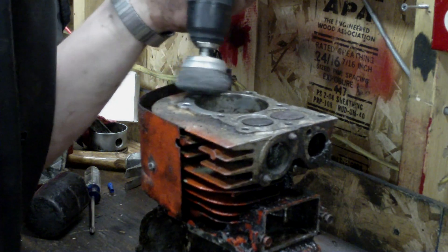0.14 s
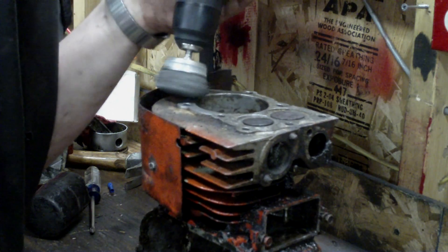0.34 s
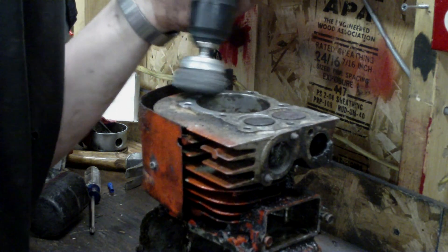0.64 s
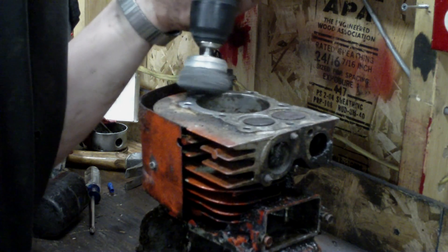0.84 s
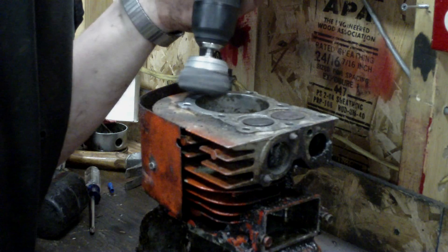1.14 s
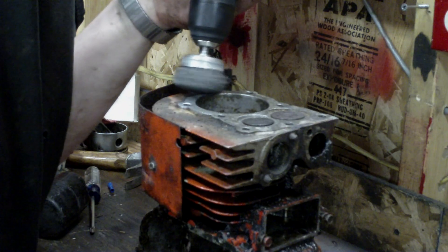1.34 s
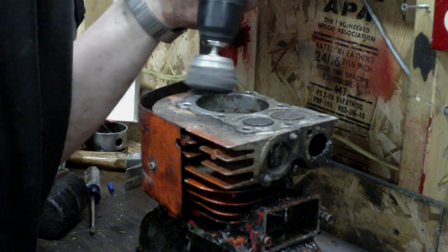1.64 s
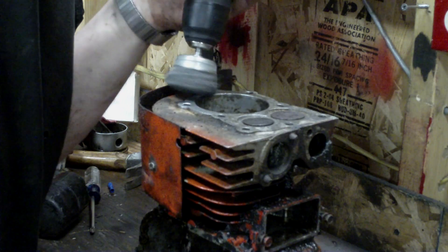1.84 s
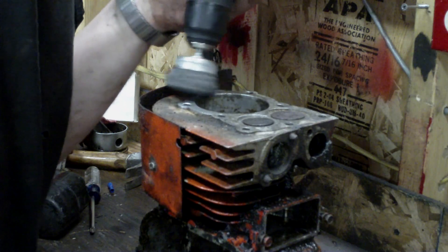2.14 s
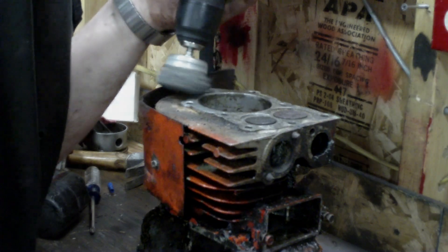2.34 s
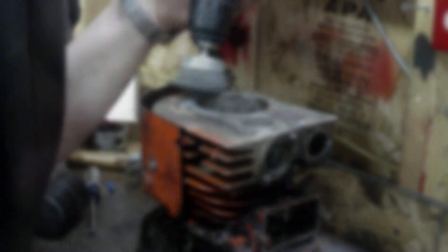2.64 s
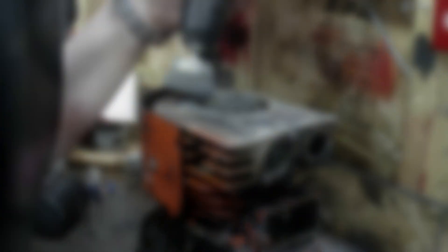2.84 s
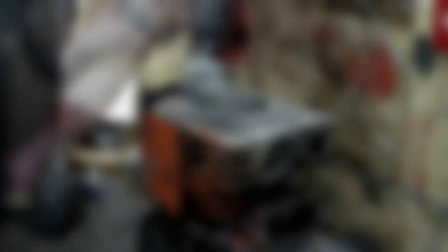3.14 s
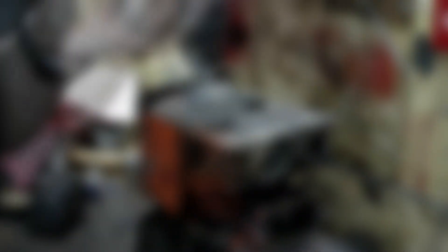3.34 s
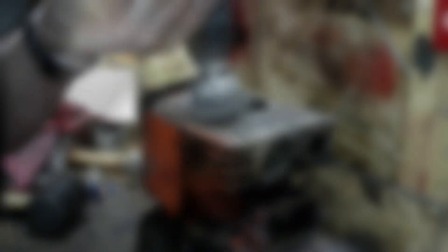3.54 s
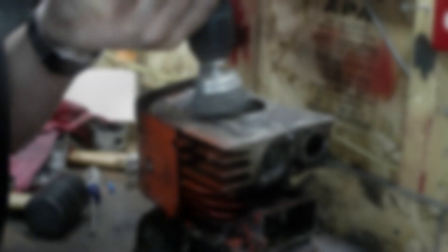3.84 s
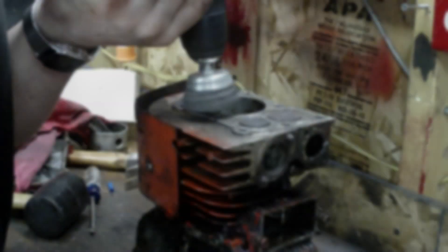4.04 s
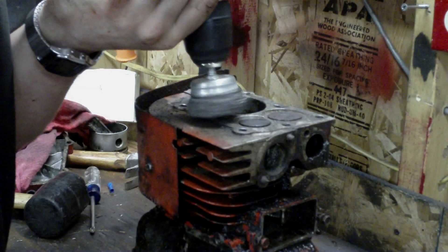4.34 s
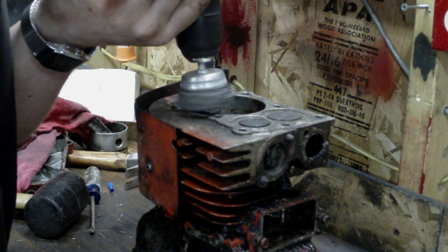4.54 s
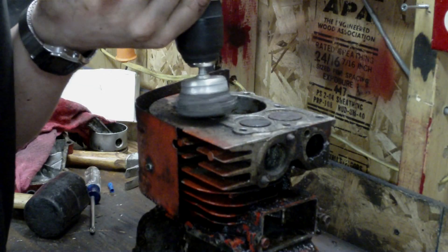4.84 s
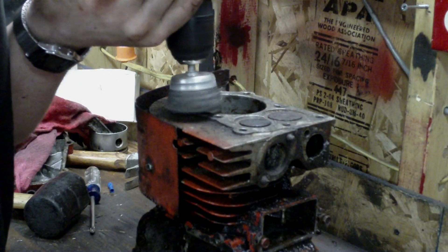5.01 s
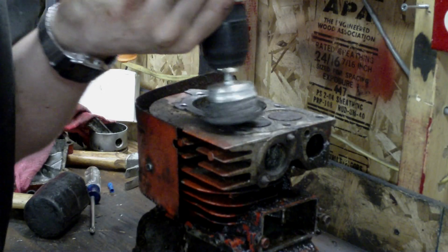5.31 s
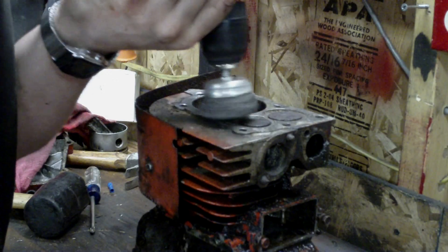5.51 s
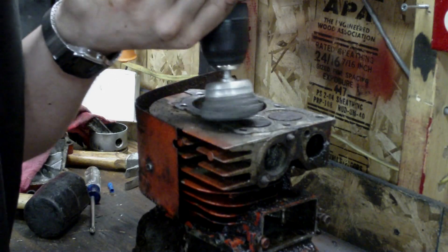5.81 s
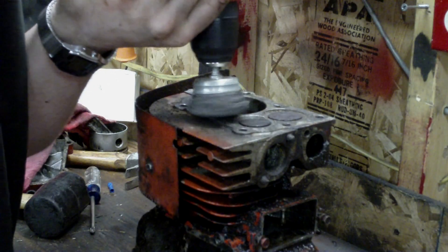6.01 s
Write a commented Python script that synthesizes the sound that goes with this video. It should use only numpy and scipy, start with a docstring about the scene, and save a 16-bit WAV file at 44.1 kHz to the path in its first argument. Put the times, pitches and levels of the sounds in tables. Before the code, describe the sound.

From the start, a wire cup brush on an electric drill scrapes loudly against a metal engine block. The sound is a dense, harsh, hissing rasp with a bright metallic ring that wavers as the brush tilts and bites. The drill's motor whines steadily underneath. At about 2.7 seconds a harder bite makes the metal sing briefly. From 3 seconds the scraping fades, reaching its quietest near 3.7 seconds, while a faster, softer pass swells in without a gap, carrying a higher, slightly wobbling whine. The brush catches in short surges around 4 and 4.6 seconds, then grows a little and continues until about 6 seconds, still quieter than the opening. A faint bench rumble runs beneath, with two barely audible dull ticks near 2.6 and 4.6 seconds. The sound is mono and thin in the bass, with a short workshop echo.

```python
"""A loud, harsh scraping over a motor's whine: a drill spins a wire cup brush on a finned engine block.
Thousands of wire tips scratch the metal and make it ring, and the workshop walls add a short echo.
This slow, loud pass fades away while a faster, quieter pass swells in.
Underneath, the bench rumbles and there are two faint ticks. The sound is mono and thin in the bass."""
import sys
import numpy as np
from scipy import signal
from scipy.fft import rfft, irfft, next_fast_len
from scipy.io import wavfile

SR = 44100
rng = np.random.default_rng(int(sys.argv[2]) if len(sys.argv) > 2 else 0)


def put_to_file(sound):
    """Save the sound as 16-bit audio at rate SR, in the file named by the first command-line argument."""
    columns = np.atleast_2d(sound).T  # one column per channel
    safe = np.clip(columns, -1, 1)
    whole_steps = np.round(safe * 32767)
    wavfile.write(sys.argv[1], SR, whole_steps.astype(np.int16))


N = 272097

# Loudness of each pass; the first fades as the second swells: t/s, base level/dB, extra fin ring/dB
SLOW_LEVEL = [(0, -28, 2), (.19, -26.5, 0.5), (.44, -26, -2), (.62, -28.5, 2.5), (.88, -26, 0),
              (1.02, -26.5, 2), (1.18, -27.5, 1), (1.3, -27.5, 0.5), (1.46, -28, -2), (1.62, -27.5, 2),
              (1.76, -27.5, -2), (1.92, -27.5, 6), (2.02, -27.5, -0.5), (2.3, -27.5, 2), (2.5, -27, 1),
              (2.76, -27.5, 1), (2.97, -30, -1.5), (3.3, -34.5, 1), (3.7, -39.5, 0)]
FAST_LEVEL = [(3.3, -45, -5), (3.85, -41.5, -2.5), (4.25, -38.5, -0.5), (4.46, -37.5, -1),
              (4.62, -36.5, 1.5), (5.1, -34.5, -0.5), (5.5, -33.5, -0.5), (5.75, -34.5, -0.5),
              (5.95, -34.5, -1.5), (6.17, -35, 1)]
# The deep part of the sound: t/s, base level of the low scrape/dB, base level of the rumble/dB
LOW_END = [(0, -54, -79), (.6, -56.5, -72.5), (1.4, -59, -77.5), (2.1, -59.5, -78), (2.65, -54, -75),
           (3.05, -63.5, -76.5), (3.5, -64, -91), (4.07, -65, -75), (4.2, -65.5, -77), (4.42, -67, -89),
           (4.55, -61, -89), (4.8, -60, -90), (5.5, -57.5, -79), (5.95, -60.5, -83), (6.17, -61, -73)]


def brush(slow_db, fast_db, bite_db):
    """Two passes overlap; scrape and fin ring wander as the cup tilts and jump when it bites."""
    # Tone colour of the brush in each pass: f/Hz, relative level/dB
    slow_colour = [(88, -73), (150, -33), (215, -27), (310, -17.5), (449, -17), (666, -9), (841, -13),
                   (1060, -9), (1690, -8), (2100, -8), (2470, -1), (2850, -1.5), (3800, -15), (6060, -18.5),
                   (11000, -28.5)]
    fast_colour = [(88, -64), (150, -25.5), (240, -26.5), (330, -13.5), (441, -12.5), (678, -2), (904, -5),
                   (1420, -2), (1610, -1), (2140, -2.5), (3290, -4), (4470, -12.5), (5850, -15),
                   (11000, -25.5)]
    # The upper fins ring more or less as the cup travels: t/s, boost/dB
    slow_fins = [(0, -13), (.2, 6), (.36, 1), (.48, 0), (1.0, -4), (1.4, 2.5), (1.75, 2), (1.9, 0.5),
                 (2.1, 3.5), (2.28, 2.5), (2.55, 1.5), (2.72, 2), (2.95, 1.5), (3.5, 1)]
    fast_fins = [(3.9, -1.5), (4.35, 0), (4.651, -2), (4.9, 1), (5.15, -3), (5.45, 1), (5.75, -5),
                 (5.95, 0), (6.17, -3)]
    # Added to each pass's base level: scrape/dB, fin ring/dB
    slow_balance = [-6, -3]
    fast_balance = [-4, -4.5]
    # The high hiss: t/s, level/dB
    hiss_levels = [(0.0, -43), (0.27, -40.5), (0.48, -43), (0.51, -39.5), (0.58, -44), (0.62, -41.5),
                   (1.18, -42.5), (1.2, -41), (1.48, -43.5), (1.53, -41.5), (2.06, -42.5), (2.78, -41),
                   (2.82, -43), (3.01, -46), (3.04, -42.5), (3.14, -47.5), (3.2, -45.5), (3.27, -49),
                   (3.35, -48.5), (3.59, -52.5), (3.92, -54), (3.97, -50.5), (4.09, -55.5), (4.14, -47.5),
                   (4.19, -53.5), (4.48, -50.5), (4.52, -48.5), (6.08, -48), (6.15, -50.5), (6.17, -47)]
    slow_bass, *slow, slow_hiss = scrape(slow_colour, slow_fins, fin_hz=2915, fin_width_hz=260, fast=False)
    fast_bass, *fast, fast_hiss = scrape(fast_colour, fast_fins, fin_hz=3840, fin_width_hz=280, fast=True)
    only_ring = np.c_[[0, 1]]  # the two rows are scrape and fin ring
    slow = slow * from_db(slow_db + np.c_[slow_balance] + only_ring * in_time(SLOW_LEVEL)[1])
    fast = fast * from_db(fast_db + np.c_[fast_balance] + only_ring * in_time(FAST_LEVEL)[1])
    tilt_db = np.array([depth_db * drift(3.6) for depth_db in (.35, .25)])
    fast_share = 1 / (1 + from_db(slow_db - fast_db) ** 2)
    slow_mix, fast_mix = np.sqrt(1 - fast_share), np.sqrt(fast_share)
    bass = from_db(in_time(LOW_END)[0] + bite_db[0]) * (slow_mix * slow_bass + fast_mix * fast_bass)
    hiss = from_db(in_time(hiss_levels)[0]) * (slow_mix * slow_hiss + fast_mix * fast_hiss)
    return bass + hiss + np.sum((slow + fast) * from_db(tilt_db + bite_db), axis=0)


def scrape(colour, fin_boost, fin_hz, fin_width_hz, fast, flicker_db=.6):
    """Wire clicks ring the block. Returns four flickering bands: bass, scrape, fin ring and hiss."""
    # Notes the block and fins ring at: f/Hz, width/Hz, slow pass boost/dB, fast pass boost/dB
    block_notes = [(200, 25, 4, 5), (232, 30, -4, -3), (382, 14, 7.5, 0), (678, 30, 6, 2.5),
                   (770, 20, 2, 7), (1076, 40, 3, -1.5), (1140, 16, 5, 7), (1574, 50, 3, 2),
                   (1685, 70, 4, 2.5), (1890, 90, 3.5, 0.7), (2130, 81, -4.5, -3), (2550, 110, 2, -2),
                   (2680, 45, 2, 3), (2810, 70, 3, 1), (2840, 14, 5, 6), (2985, 90, -4.5, -1),
                   (3050, 40, 0, -4), (3100, 100, 3.5, 3), (3300, 50, 0, 2), (3375, 55, 3, 6.5),
                   (3650, 110, 0, 5), (3790, 120, 1, -3), (4060, 100, 3, 1.5), (4980, 210, 3, 2),
                   (5710, 170, 2.5, 3), (6150, 120, 4.5, 2.5), (6620, 90, 4, 3), (7370, 70, 4, 1),
                   (8150, 110, 5, 2.5)]
    # Borders between bass, scrape, fin ring, treble and air: f/Hz
    borders = [500, 2100, 3800, 6800]
    x = bristles()
    for note_hz, width_hz, slow_db, fast_db in block_notes:
        wander = 1 + .35 * drift(4)  # each note comes and goes as the cup moves
        x = ring(x, note_hz, width_hz, (fast_db if fast else slow_db) * wander)
    x = ring(x, fin_hz, fin_width_hz, *in_time(fin_boost))
    size = next_fast_len(N)
    hz = np.maximum(np.arange(size // 2 + 1) * SR / size, 10)
    colour_hz, colour_db = np.transpose(colour)
    spectrum = rfft(x, size) * from_db(np.interp(np.log(hz), np.log(colour_hz), colour_db))
    above = [1] + [1 / (1 + (edge / hz) ** 10) for edge in borders] + [0]  # share above each border
    bands = []
    for low, high, depth in zip(above, above[1:], [2, 1, 1.5, 1.5, 1.5]):
        band = irfft(spectrum * (low - high), size)[:N]
        bands.append(band * from_db(depth * flicker_db * drift(21)))
    *lower, treble, air = bands
    return np.array([unit_level(band) for band in lower + [treble + air]])


def bristles(tips_per_s=14000, spread_db=2.5, clump_db=.5):
    """Wire tips strike at random, in uneven sizes and small clumps."""
    sizes = from_db(spread_db * np.minimum(rng.exponential(1, N), 4)) * rng.choice([-1, 1], N)
    strikes = rng.random(N) < tips_per_s / SR
    return sizes * strikes * from_db(clump_db * drift(11.6))


def pass_levels():
    """The base level of the fading pass and of the swelling pass, and the boost of the bites, in dB."""
    # The cup bounces and its bite changes for a moment: t/s, scrape boost/dB, fin ring boost/dB
    bites = [(.2, 1, -1), (.33, 2.5, -1), (.68, 1.5, 2.5), (.77, 3, 1), (.96, 1, 1.5), (1.01, 1, 0.5),
             (1.24, 1, 2.5), (1.36, 1.5, 2.5), (1.62, 2.5, -0.5), (1.88, 1, -0.5), (2.0, -2, -1),
             (2.12, 1.5, 0.5), (2.26, 1, -1), (2.37, 1, -1), (2.66, 1.5, -1), (2.74, 0, -1), (3.04, 2.5, 3),
             (3.22, 2, 3.5), (3.37, 2, 2.5), (3.97, 5.5, 7), (4.135, 6, 0), (4.57, 5, 4.5), (4.8, 1.5, 3),
             (5.44, 1, 0.5)]
    t = np.arange(N) / SR
    fade_db_per_s, bite_half_s = 19, .03
    slow_db = in_time(SLOW_LEVEL)[0] - fade_db_per_s * np.maximum(t - SLOW_LEVEL[-1][0], 0)
    fast_db = in_time(FAST_LEVEL)[0] + swell_in(FAST_LEVEL[0][0])
    bite_db = sum(np.c_[db] * np.exp(-((t - at_s) / bite_half_s) ** 2) for at_s, *db in bites)
    return slow_db, fast_db, bite_db


def hard_bite(x, at_s=2.69, half_s=.11):
    """One long, hard bite makes a few of the metal's notes sing out."""
    # Notes changed by the bite: f/Hz, width/Hz, boost/dB
    singing = [(1918, 30, 7), (2050, 150, -5), (2840, 30, 4), (3385, 50, 6), (3740, 70, 7), (4000, 40, 7)]
    strength = np.exp(-((np.arange(N) / SR - at_s) / half_s) ** 4)
    for hz, width_hz, boost_db in singing:
        x = ring(x, hz, width_hz, boost_db * strength)
    return x


def ring(x, hz, width_hz, boost_db):
    """The metal rings at one note: a narrow band of the sound is turned up or down over time."""
    poles = peak(hz, width_hz, np.mean(boost_db))[1]
    k = poles[0] - 1
    band = signal.lfilter([k, 0, -k], poles, x)
    return x + (from_db(boost_db) - 1) * band


def slow_motor(base_db):
    """In the slow pass the motor sounds at 1, 3 and 6 times its turning speed."""
    # The motor's speed and the swell of its tones: t/s, turning speed/Hz, boost/dB
    running = [(0, 270, 3), (.17, 267, 3), (.27, 260, 1), (.4, 259.3, 0), (.52, 259, -6), (.66, 262, -1),
               (.74, 263, 0), (.82, 257, -7), (1.0, 256.1, -2), (1.4, 257.5, 1), (1.85, 260, 3),
               (2.0, 260.5, -1), (2.07, 260.5, -8), (2.14, 260.5, 2), (2.6, 255, 1), (2.78, 254.5, 0),
               (2.88, 255.4, -8), (3.0, 257, -3), (3.7, 255, -3)]
    # Added to the base level for each of the three tones: level/dB
    balance = [-37.5, -18, -27.5]
    hz, swell_db = in_time(running)
    levels_db = base_db + swell_db + np.c_[balance]
    return motor(hz, [1, 3, 6], levels_db, flutter_db=2.2, lowest_flutter_db=1.5)


def fast_motor(base_db, gear_ratio=2.165):
    """In the fast pass the motor whines at 1, 2 and 3 times its turning speed, and a gear adds a tone."""
    # The motor's whine: t/s, turning speed/Hz, level of tone 1/dB, level of tone 2/dB
    running = [(3.4, 590, -60, -70), (3.56, 562, -53, -68), (3.72, 526.4, -58, -66),
               (3.98, 513.4, -54, -56), (4.15, 519, -54, -58), (4.36, 529.4, -51, -53),
               (4.5, 536, -43.5, -57), (4.66, 534.7, -45, -52.5), (5.06, 536.5, -44.5, -50.5),
               (5.3, 526, -51, -52), (5.45, 520, -53, -53.5), (5.53, 516, -58, -58), (5.64, 514, -51, -56),
               (5.84, 518, -53, -55), (5.92, 526, -54, -51), (6.17, 528, -49, -48.5)]
    # Added to the base level: gear tone/dB, tone 3/dB
    balance = [-17.5, -22]
    hz, *whine_db = in_time(running)
    whine_db = whine_db + swell_in(running[0][0])
    upper_db = base_db + np.c_[balance]
    return motor(hz, [1, 2, gear_ratio, 3], [*whine_db, *upper_db], flutter_db=3, lowest_flutter_db=2.8)


def motor(hz, multiples, levels_db, flutter_db, lowest_flutter_db, wobble=.003):
    """Pure tones at multiples of the turning speed, which wobbles as the wires catch."""
    turns = np.cumsum(hz * (1 + wobble * drift(23.4))) / SR
    depths_db = [lowest_flutter_db] + [flutter_db] * (len(multiples) - 1)
    gains = [from_db(db + depth * drift(8.9)) for db, depth in zip(levels_db, depths_db)]
    return np.sqrt(2) * sum(gain * np.sin(2 * np.pi * k * turns) for k, gain in zip(multiples, gains))


def rumble(jolts_per_s=50, wander_db=3.5):
    """Low jolts travel through the bench as the cup bounces, over an uneven shake."""
    jolts = (rng.random(N) < jolts_per_s / SR) * rng.uniform(-1, 1, N)
    push = unit_level(jolts) + .43 * rng.standard_normal(N)
    shake = signal.sosfilt(signal.butter(2, [85, 210], "band", fs=SR, output="sos"), push)
    return from_db(in_time(LOW_END)[1] + wander_db * drift(6)) * unit_level(shake)


def ticks(half_s=.00027):
    """Two faint, dull ticks, each one short rounded dip in the wave."""
    # The ticks: t/s, peak level/dB
    moments = [(2.624, -46), (4.627, -33.5)]
    t = np.arange(N) / SR
    return -sum(from_db(db) * np.exp(-((t - at_s) / half_s) ** 2) for at_s, db in moments)


def workshop(x, echo_s=.25, echo_db=-13):
    """The wooden walls add a short, dying echo; the overall level stays the same."""
    t = np.arange(SR // 2) / SR
    tail = rng.standard_normal(len(t)) * from_db(-60 * t / echo_s) * (t > .004)
    echo = signal.fftconvolve(x, tail / np.linalg.norm(tail))[:N]
    gain = from_db(echo_db)
    return (x + gain * echo) / np.sqrt(1 + gain ** 2)


def swell_in(until_s, db_per_s=33):
    """A level in dB that climbs steadily to 0 and stays there."""
    return -db_per_s * np.maximum(until_s - np.arange(N) / SR, 0)


def drift(rate_hz):
    """Smoothed noise that wanders by about 1 either way; a higher rate wanders faster."""
    step, warm_up = 40, 2000
    r = np.exp(-2 * np.pi * step * rate_hz / SR)
    noise = rng.standard_normal(N // step + warm_up + 2)
    smooth = signal.lfilter([1], [1, -2 * r, r * r], noise)[warm_up:]
    return np.interp(np.arange(N) / step, np.arange(len(smooth)), unit_level(smooth))


def peak(hz, width_hz, boost_db):
    """A filter that turns one narrow band up or down."""
    gain, angle = from_db(boost_db / 2), 2 * np.pi * hz / SR
    k = np.sin(angle) * width_hz / hz / 2
    middle = -2 * np.cos(angle)
    return [1 + k * gain, middle, 1 - k * gain], [1 + k / gain, middle, 1 - k / gain]


def in_time(rows):
    """Join a table's points with straight lines: one curve for each column after the time."""
    times, *columns = np.transpose(rows)
    return [np.interp(np.arange(N) / SR, times, column) for column in columns]


def from_db(db):
    """Turn decibels into a number to multiply by."""
    return 10 ** (np.asarray(db) / 20)


def unit_level(x):
    """Scale a signal to an average power of 1."""
    return x / np.sqrt(np.mean(x ** 2) + 1e-20)


def scene():
    """Brush, motor, rumble and two faint, dull ticks are mixed into one mono sound."""
    slow_db, fast_db, bite_db = pass_levels()
    whine = slow_motor(slow_db) + fast_motor(fast_db + bite_db[0])
    scraping = hard_bite(brush(slow_db, fast_db, bite_db))
    mono = workshop(scraping) + whine + rumble() + ticks()
    return np.array([mono, mono])


def record(dry, cutoff_hz=11030):
    """The treble has a narrow dip near 7.9 kHz, and the highest sounds are cut off steeply."""
    dipped = signal.lfilter(*peak(hz=7855, width_hz=85, boost_db=-15), dry)
    return signal.sosfilt(signal.ellip(11, .3, 70, cutoff_hz, fs=SR, output="sos"), dipped)


dry = scene()
out = record(dry)
put_to_file(out)
```